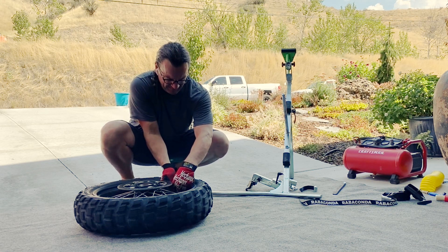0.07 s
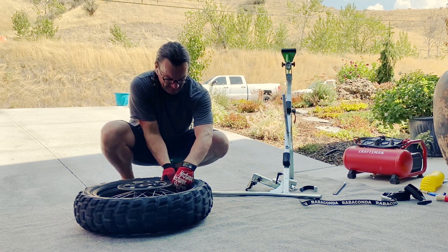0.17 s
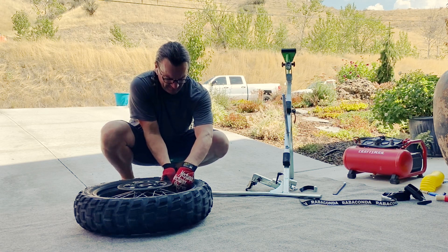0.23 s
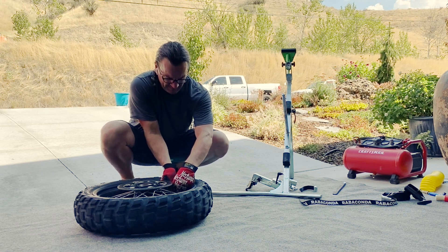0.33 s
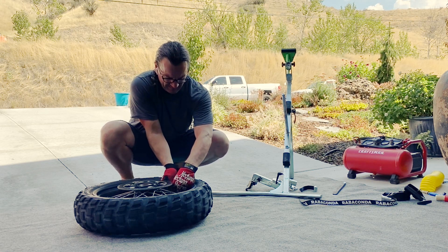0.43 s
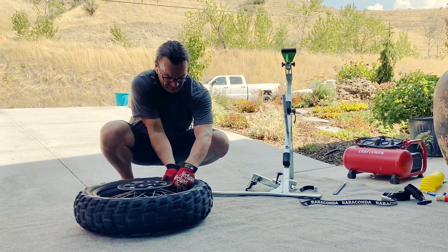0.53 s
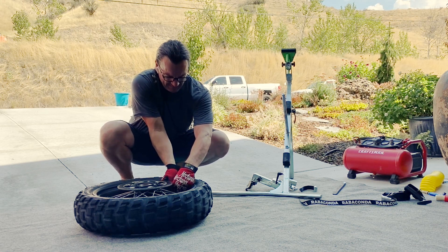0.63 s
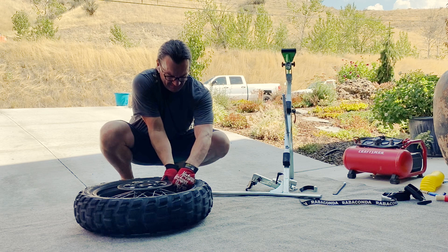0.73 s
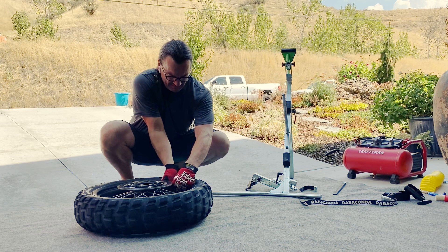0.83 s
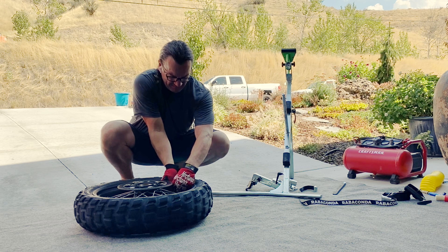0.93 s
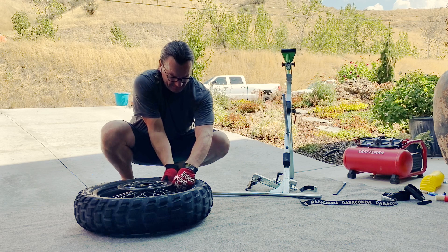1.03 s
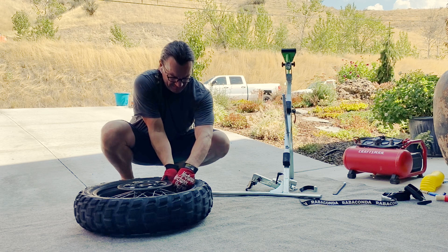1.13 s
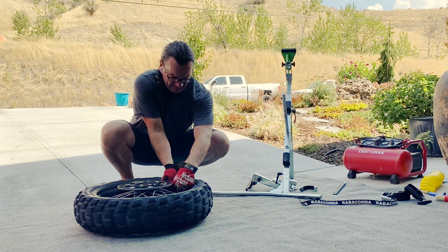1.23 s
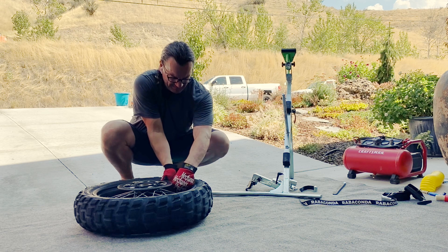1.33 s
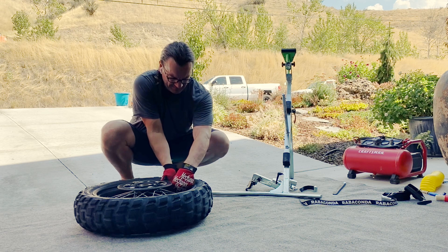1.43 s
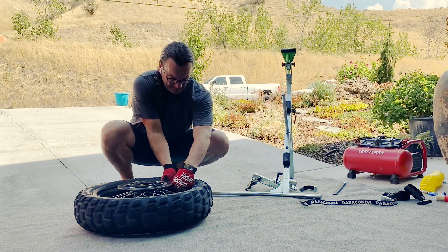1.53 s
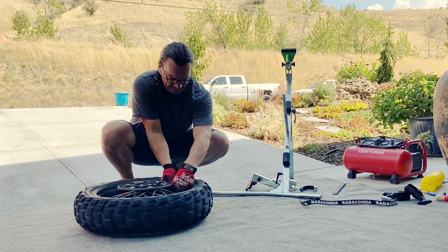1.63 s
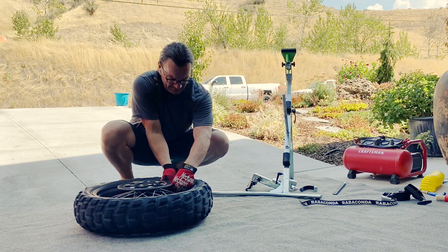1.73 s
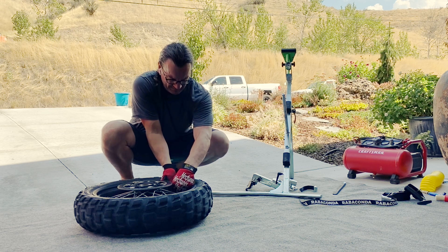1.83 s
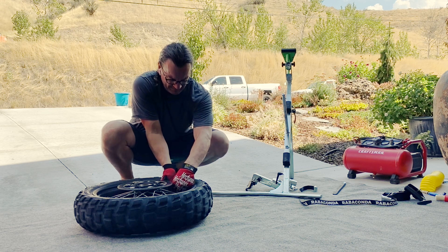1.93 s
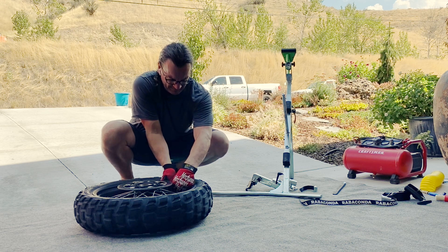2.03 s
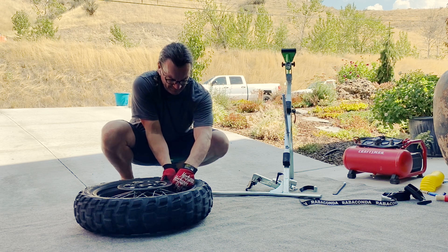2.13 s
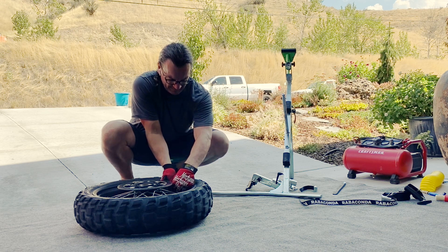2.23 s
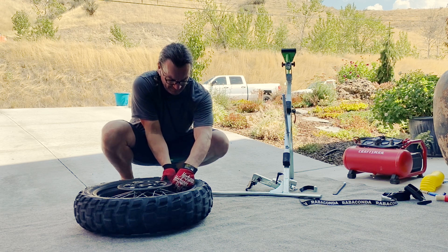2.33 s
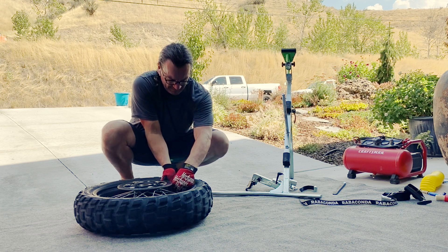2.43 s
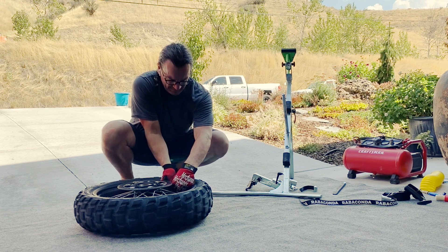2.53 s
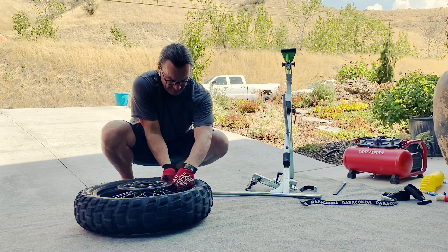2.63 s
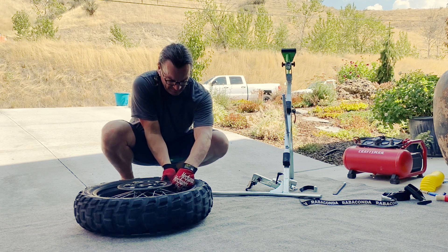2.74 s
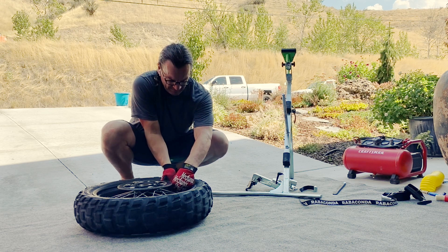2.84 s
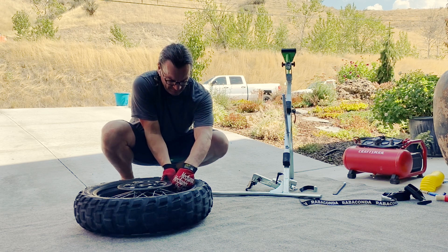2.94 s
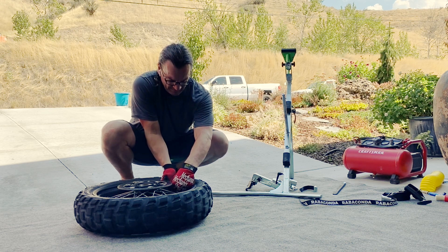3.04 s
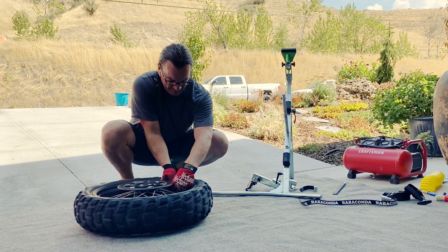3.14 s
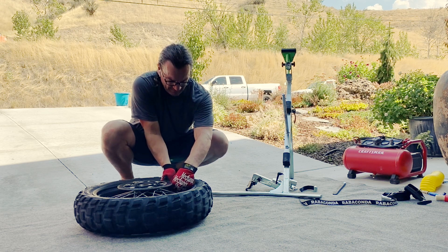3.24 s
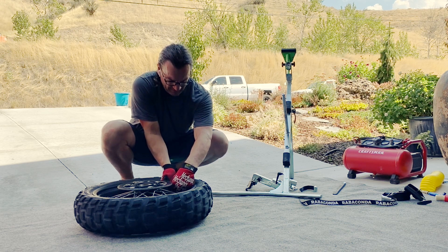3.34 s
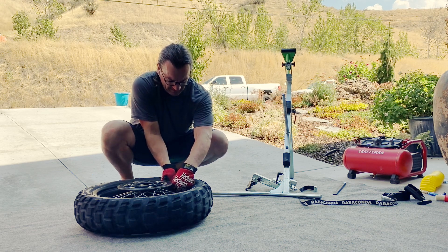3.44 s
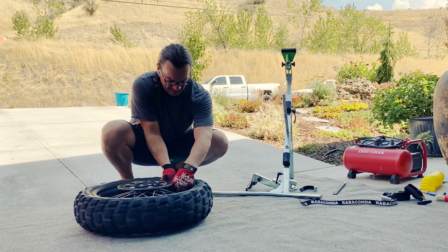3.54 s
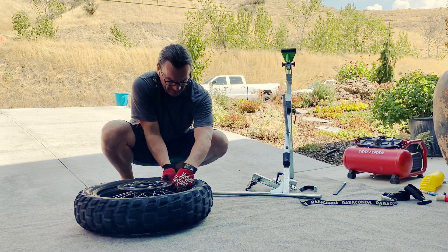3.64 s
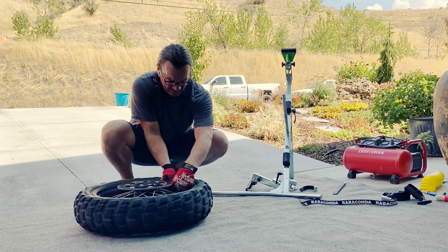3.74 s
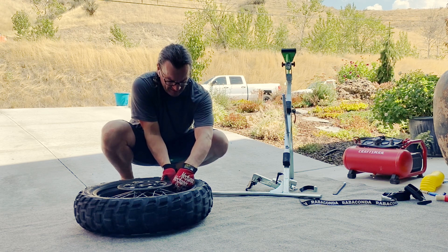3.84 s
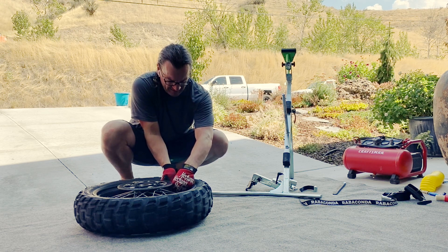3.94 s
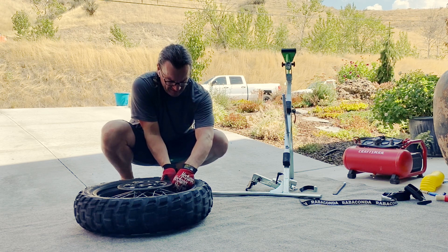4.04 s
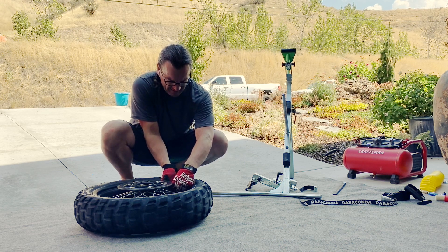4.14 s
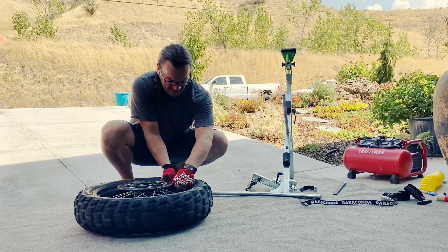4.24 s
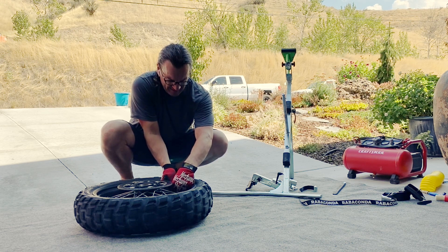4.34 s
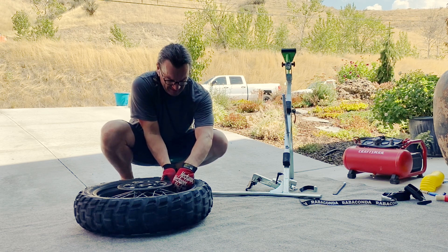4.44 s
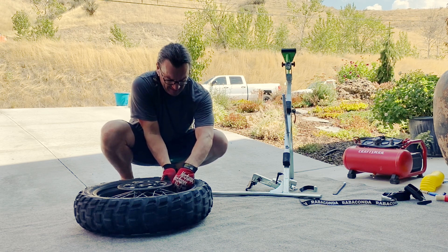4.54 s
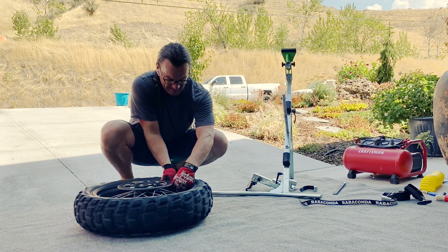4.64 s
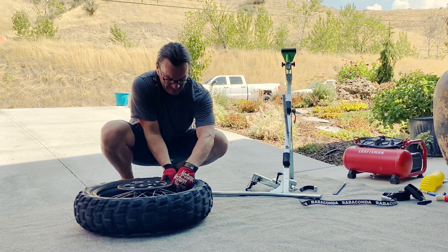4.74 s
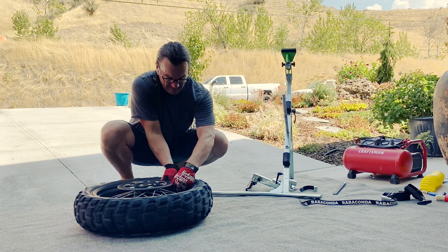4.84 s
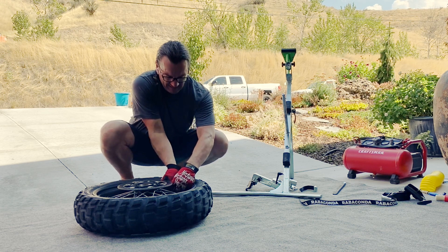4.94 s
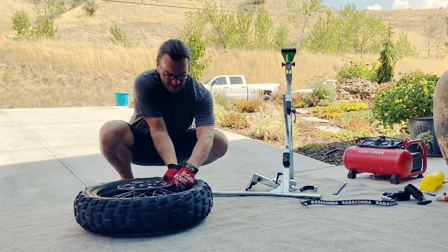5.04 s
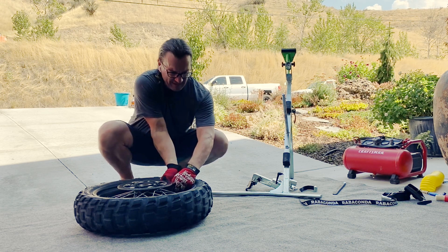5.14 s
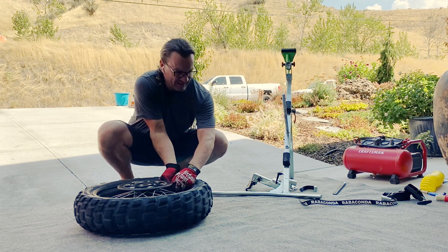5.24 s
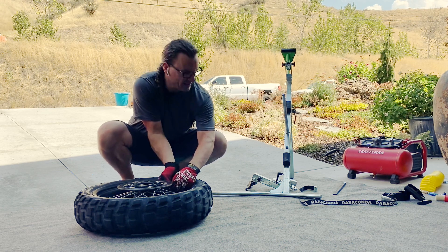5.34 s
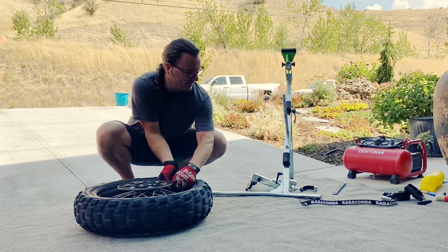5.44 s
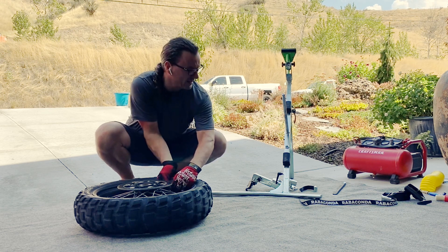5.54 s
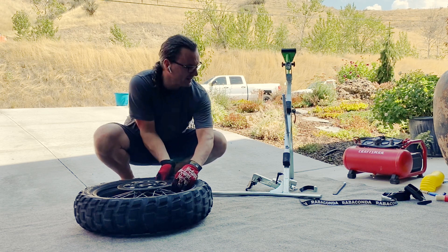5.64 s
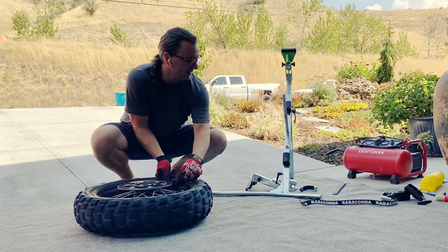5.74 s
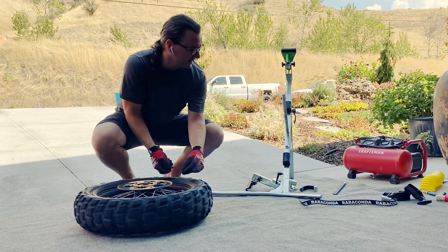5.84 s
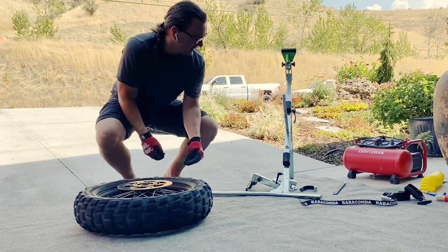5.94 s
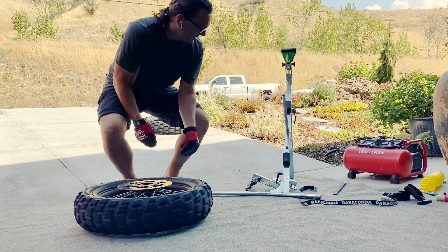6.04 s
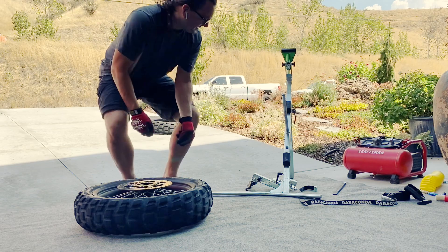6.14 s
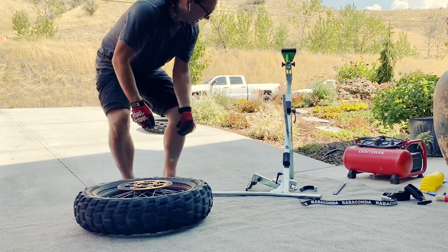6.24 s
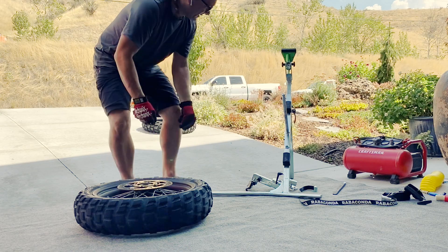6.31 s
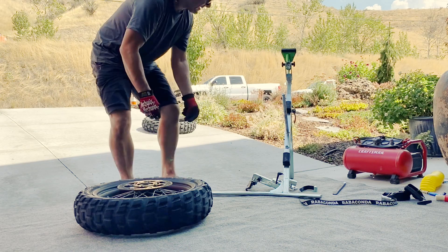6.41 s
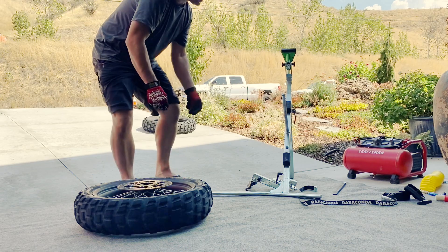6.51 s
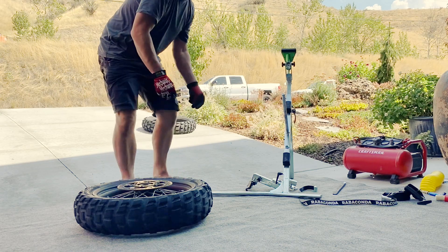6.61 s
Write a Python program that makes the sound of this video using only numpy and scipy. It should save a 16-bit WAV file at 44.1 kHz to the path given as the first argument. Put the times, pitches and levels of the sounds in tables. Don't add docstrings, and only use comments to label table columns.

```python
import sys
import numpy as np
from scipy import signal
from scipy.fft import rfft, irfft, next_fast_len
from scipy.io import wavfile
from scipy.ndimage import uniform_filter1d

SR = 44100
rng = np.random.default_rng(int(sys.argv[2]) if len(sys.argv) > 2 else 0)


def unload_audio(sound):
    columns = np.transpose(np.atleast_2d(sound))
    steps = np.round(np.clip(columns, -1, 1) * 32767)
    wavfile.write(sys.argv[1], SR, steps.astype(np.int16))


def gain_from_db(level_db):
    decades = np.asarray(level_db, float) / 20
    return 10 ** decades


N = 294147
T = np.arange(N) / SR
COARSE_S = np.arange(0, N + 32, 32) / SR
PADDED = next_fast_len(N + 4096)
HZ = np.fft.rfftfreq(PADDED, 1 / SR) + 1e-3
SPURT_ATTACK_S, SPURT_RELEASE_DB_PER_S = 0.031, 272


def rms_one(x):
    return x / np.sqrt(np.mean(x ** 2) + 1e-20)


def in_time(rows):
    s, value = np.transpose(rows)
    return np.interp(T, s, value)


def at_hz(points):
    hz, value = np.transpose(points)
    return np.interp(np.log(HZ), np.log(hz), value)


def filtered(x, response):
    return irfft(rfft(x, PADDED) * response, PADDED)[..., :N]


def modes(table):
    power = 0
    for hz, width_hz, db in table:
        power = power + gain_from_db(db) ** 2 / (1 + (2 * (HZ - hz) / width_hz) ** 2) ** 2
    return power


def drift(rate):
    r = np.exp(-80 * np.pi * rate / SR)
    slow = signal.lfilter([1], [1, -2 * r, r * r], rng.standard_normal(N // 40 + 2002))[2000:]
    return np.interp(np.arange(N) / 40, np.arange(len(slow)), rms_one(slow))


def noise(gain):
    return rms_one(filtered(rng.standard_normal((2, PADDED)), gain))


def bursts(start, length, change_db, attack_s, release_db_per_s):
    t = COARSE_S - start[:, None]
    held_db = np.clip(t / length[:, None], 0, 1) * change_db[:, None]
    fall_db = release_db_per_s * np.maximum(t - length[:, None], 0)
    return np.clip(t / attack_s + .5, 0, 1) ** 2 * gain_from_db(held_db - np.minimum(fall_db, 120))


def summed(gains, db):
    return np.interp(T, COARSE_S, np.sqrt(gain_from_db(db) ** 2 @ gains ** 2))


def played(rows):
    start, length, db, change_db = np.transpose(rows)
    return summed(bursts(start, length, change_db, SPURT_ATTACK_S, SPURT_RELEASE_DB_PER_S), db)


# pitch_hz, level_db_per_hz
RUMBLE = [(12, -41), (20, -18), (43, -7), (72, -7), (133, -8), (187, -15.5), (228, -14.5), (464, -21),
          (600, -35.5), (780, -73), (1320, -120)]
# pitch_hz, level_db_per_hz
AIR = [(290, -40), (500, 1), (960, -4.5), (1310, -3), (1780, -9), (1970, -3.5), (3000, -9), (3900, -22),
       (6600, -120)]
# time_s, level_db
BREEZE = [(0, 8), (.3, 4), (.8, 0.5), (1.3, 3.5), (1.5, -2), (1.68, 2), (1.9, 7), (3.1, 4.5), (3.4, 11),
          (3.7, 4), (4.2, 3)]


def hush():
    breeze_db = in_time(BREEZE)
    rumble = gain_from_db(-64.5 + 0.26 * breeze_db + 0.27 * drift(7.1)) * noise(gain_from_db(at_hz(RUMBLE)))
    return rumble + gain_from_db(-76 + breeze_db) * noise(gain_from_db(at_hz(AIR)))


# time_s, pitch_hz
ENGINE_HZ = [(0, 63.2), (1, 64.96), (2, 68), (3, 70.55), (4.2, 72.85), (6.67, 72.5)]
# time_s, level_db
ENGINE_DB = [(0.0, -55), (0.07, -52.5), (0.82, -64), (1.86, -59), (2.43, -64.5), (2.86, -62), (2.93, -85),
             (3.32, -68), (3.47, -78), (3.57, -66), (3.64, -77), (3.75, -63), (3.94, -83), (4.1, -56.5),
             (4.4, -65.5), (6.35, -59), (6.5, -79), (6.67, -60)]
# multiple, level_db
ENGINE_ORDERS = [(1.5, -23.5), (2, -15.5), (2.5, -22.5)]


def engine():
    phase = 2 * np.pi * np.cumsum(in_time(ENGINE_HZ) * (1 + 0.0057 * drift(10.0))) / SR
    tone = np.sin(phase)
    for multiple, order_db in ENGINE_ORDERS:
        tone = tone + gain_from_db(order_db + 2.3 * drift(3.7)) * np.sin(multiple * phase)
    return np.sqrt(2) * gain_from_db(in_time(ENGINE_DB) - 0.3) * tone * np.array([[1], [0]])


# start_s, peak_db, brightness_db, weight_db
TICKS = [
    (0.651, -52, -13, -20),
    (2.614, -42.5, -16, -15),
    (2.957, -40, -2.5, -15.5),
    (3.465, -47.5, -2, -5),
    (3.473, -35, -9, -9),
    (3.672, -50, -26, -4.5),
    (3.867, -38, -16, -9.5),
    (3.93, -45, -9, -6),
    (4.916, -24.5, -14.5, -28),
]
# pitch_hz, level_db, t60_s, share of brightness (0-1), share of weight (0-1)
RIM = [(361, 11, 0.054, 0.06, 0.95), (448, 4, 0.036, 0, 0.8), (557, 2.5, 0.043, 0.1, 0.12),
       (890, 1, 0.025, 0.1, 0), (1150, 3.5, 0.017, 0.34, 0.06), (1360, 15, 0.0032, 0.7, 0),
       (2170, 8.5, 0.0083, 1, 0.03), (2580, 13, 0.0075, 0.95, 0.1), (2970, 5.5, 0.0073, 1, 0.13),
       (3560, 8, 0.0072, 0.4, 0.3), (4240, 11, 0.0097, 0.96, 0.1)]


def ticks():
    out = np.zeros((2, N))
    start, peak_db, bright_db, weight_db = np.transpose(TICKS)
    bounce_s, bounce_db = np.array([0, .0021, .0047, .0078]), np.array([0.5, -2.0, -5.0, -6.5])
    contacts = np.round((start[:, None] + bounce_s) * SR).astype(int)
    for hz, db, t60, bright, heavy in RIM:
        strike_db = peak_db + bright * bright_db + heavy * weight_db + db - 15.0
        uneven = gain_from_db(rng.normal(0, 2, (2,) + contacts.shape)) * rng.choice([-1, 1], contacts.shape)
        clicks = np.full((2, N), 1e-18)
        clicks[:, contacts] = gain_from_db(strike_db[:, None] + bounce_db) * uneven
        r, w = gain_from_db(-60 / (t60 * SR)), 2 * np.pi * hz / SR
        out += signal.lfilter([0, np.sin(w)], [1, -2 * r * np.cos(w), r * r], clicks)
    crack_db, crack_s = -4, 0.0033
    touch = np.zeros(N)
    touch[contacts[:, 0]] = gain_from_db(peak_db + crack_db + 0.34 * bright_db)
    crack = signal.lfilter([1], [1, -np.exp(-1 / (crack_s * SR))], touch + 1e-18)
    out += crack * rng.standard_normal((2, N))
    return signal.sosfilt(signal.butter(3, [260, 4500], "band", fs=SR, output="sos"), out)


# start_s, length_s, hiss_db, change_db, whistle_db (re hiss)
SEEPS = [(0.0, .52, -60, 7, -5.5), (.52, 0.21, -52.5, -3, -22), (0.798, 0.31, -59, 0.5, -26),
         (1.17, 0.35, -58.5, -2, -16), (1.514, .1, -60, 1.5, -12), (1.62, .11, -55.5, -1.5, -14),
         (1.88, 0.18, -61.5, 5, -10), (2.1, .33, -65.5, 6, -15), (2.439, 0.064, -59, 4, -14),
         (2.605, 0.38, -62, -1, 2), (2.968, 0.041, -56, -1, -11), (3.08, 0.075, -59, -2, -3),
         (3.2, 0.26, -53, 0.5, -4.5), (3.49, 0.18, -62, -1, -4), (3.87, 2.9, -54.5, -4, -12)]
# start_s, length_s, level_db
RESTS = [
    (1.36, .26, -3.5),
    (3.659, 0.19, -1.5),
]
# pitch_hz, level_db_per_hz
SEEP_UPPER = [(4700, -33), (8000, -35), (8400, -15), (8900, -2), (10100, 0.5), (10700, -1.5), (12500, 5.5),
              (14900, 4.5), (15800, 4)]
# pitch_hz, level_db_per_hz
SEEP_LOWER = [(880, -25), (1500, -15), (1820, -18), (2050, -9), (3430, -4), (4460, -4.5), (4930, -1),
              (6000, -5), (6740, 1.5), (8500, -4), (11000, -4), (18700, -120)]
# pitch_hz, width_hz, level_db
SEEP_WHISTLE = [(3460, 120, -5), (5100, 150, -8), (6530, 340, -3), (11300, 450, -6), (12130, 820, 5),
                (13000, 400, -6)]


def seep():
    steady_upper_db, steady_lower_db, steady_whistle_db = -62.5, -64, -74.5
    start, length, hiss_db, change_db, whistle_db = np.transpose(SEEPS)
    seeps = bursts(start, length, change_db, attack_s=0.043, release_db_per_s=200)
    rest_db = 0
    for rest_s, rest_length, db in RESTS:
        rest_db = rest_db + db * (np.abs(T - rest_s - rest_length / 2) < rest_length / 2)
    steady_upper, steady_lower = gain_from_db(steady_upper_db + rest_db), gain_from_db(steady_lower_db + rest_db)
    lower_db = hiss_db - 7.5 + 2.5 * (np.arange(len(start)) < 2)
    upper = np.hypot(summed(seeps, hiss_db), steady_upper)
    lower = np.hypot(summed(seeps, lower_db), steady_lower)
    whistle = np.hypot(summed(seeps, hiss_db + whistle_db), gain_from_db(steady_whistle_db - 1))
    whistle = whistle * gain_from_db(1.5 * drift(8))
    hiss = upper * noise(gain_from_db(at_hz(SEEP_UPPER))) + lower * noise(gain_from_db(at_hz(SEEP_LOWER)))
    low_whistle = gain_from_db(steady_whistle_db - steady_lower_db) * steady_lower
    hiss = hiss + low_whistle * noise(np.sqrt(modes(SEEP_WHISTLE[:3])))
    return hiss + whistle * noise(np.sqrt(modes(SEEP_WHISTLE)))


# pitch_hz, level_db_per_hz
CAVITY_SKIRT = [(47, -51), (80, -14), (382, 0.5), (561, 7.5), (661, -27), (949, -9.5), (1300, -21),
                (1690, -58), (2860, -120)]
# pitch_hz, width_hz, level_db
CAVITY = [(232, 190, -12.5), (351, 167, -4), (502, 69, -1), (541, 93, 0), (580, 54, 2.5), (667, 100, -5),
          (842, 55, -7), (1034, 41, -21.5)]


def cavity():
    skirt = gain_from_db(at_hz(CAVITY_SKIRT) - 7.5)
    return noise(np.sqrt(skirt ** 2 + modes(CAVITY))) * gain_from_db(0.13 * drift(4))


# pitch_hz, width_hz, level_db
SPRAY_BODY = [(2000, 500, 0), (2730, 800, 0)]


def glove(spray):
    return gain_from_db(-11.5) * spray * noise(np.sqrt(modes(SPRAY_BODY)))


def free_outflow():
    core_out_s, jet_db, surge_db, surge_s, sag_db_per_s = 5.47, -27, 6.5, 0.19, 3.5
    since = np.maximum(T - core_out_s, 0)
    level_db = jet_db + surge_db * np.exp(-since / surge_s) - sag_db_per_s * since
    free = np.clip(since / SPURT_ATTACK_S, 0, 1) * gain_from_db(level_db)
    through = np.where(since > 0, 0.24, np.where(T > 4.93, 0.66, 0.26))
    return free, through


# start_s, length_s, jet_db, change_db, struck_db (part hitting tool and fingers)
SPURTS = [(3.875, .01, -48, -4, 0), (3.888, 0.07, -62, 4, 3.5), (3.932, .14, -50.5, -3.5, 5),
          (4.087, .12, -65.5, -7, 9), (4.223, 0.099, -54, 10, 3), (4.309, 0.1, -38.5, 4, 7),
          (4.45, 0.2, -48, 2, -0.5), (4.621, 0.11, -38.5, -2.5, 2.5), (4.718, 0.043, -35, -2, 3.5),
          (4.776, .13, -36, 0, -1.5), (4.916, 0.064, -28.5, 0, -0.5), (4.985, 0.047, -31, 1, -1),
          (5.021, 0.037, -32.5, 0.5, 3), (5.063, 0.17, -27.5, 7, -3.5), (5.232, 0.14, -22, 5, -1.5),
          (5.376, 0.09, -19.5, 0, 1)]
# start_s, length_s, level_db, change_db
SPRAYS = [
    (4.432, 0.16, -45.5, -5),
    (5.552, 0.063, -28.5, -1),
    (6.298, .4, -42.5, 2.5),
]
# start_s, length_s, level_db, change_db
HUMS = [
    (5.14, .19, -46, 10),
    (5.33, 0.11, -29, -1),
    (5.46, 0.14, -35, 0.5),
    (5.56, 0.26, -29, -2),
    (5.8, 0.84, -29.5, -4.5),
]
# pitch_hz, level_db_per_hz
JET = [(3000, -52), (5000, -28), (6060, -5), (7300, -8), (8200, -1.5), (8900, 2), (9590, 2), (12300, 7),
       (14500, 6.5), (15800, 2.5)]
# pitch_hz, level_db_per_hz
SPLASH = [(1760, -45), (3000, -7), (3620, -3), (5000, 1.5), (6050, -1), (6870, -5), (7430, -2.5),
          (8500, -5.5), (11000, -2.5), (18700, -120)]
# pitch_hz, level_db_per_hz
RUSH = [(440, -40), (750, -0.5), (850, 2.5), (938, -7), (995, -4), (1190, 1), (1740, -4), (2530, 0.5),
        (3600, -4.5), (4680, -31), (7920, -120)]
# pitch_hz, width_hz, level_db (over the plain jet)
STEM = [(2650, 280, 0), (4630, 250, 0.5), (6860, 870, 10.5), (9590, 260, 4.5), (10300, 90, -4),
        (12150, 320, -11.5), (16000, 600, -3)]


def valve():
    start, length, jet_db, change_db, struck_db = np.transpose(SPURTS)
    spurts = bursts(start, length, change_db, SPURT_ATTACK_S, SPURT_RELEASE_DB_PER_S)
    puff_db, puff_s = 1, 0.013
    puffs = spurts * gain_from_db(puff_db * np.exp(-np.abs(COARSE_S - start[:, None]) / puff_s))
    free, through = free_outflow()
    spray = played(SPRAYS)
    jet = np.hypot(summed(spurts, jet_db), free)
    splash = np.hypot(summed(spurts, jet_db - 8 + 0.76 * struck_db), free * gain_from_db(-8))
    splash = np.hypot(splash, spray)
    rush = np.hypot(summed(puffs, jet_db - 12 + 1.39 * struck_db), free * gain_from_db(-14))
    ring = np.hypot(summed(puffs, jet_db - 18 + 1.53 * struck_db), played(HUMS))
    hiss = ring * cavity() + rush * noise(gain_from_db(at_hz(RUSH)))
    for spectrum, gain in [(JET, jet), (SPLASH, splash)]:
        colour = gain_from_db(at_hz(spectrum))
        open_air = noise(colour)
        piped = noise(colour * np.sqrt(1 + modes(STEM)))
        hiss = hiss + gain * (np.sqrt(1 - through) * open_air + np.sqrt(through) * piped)
    return hiss + glove(spray)


def shading(x, patchy_db, flutter_db):
    frames = signal.stft(x, nperseg=512)[2]
    patches = rng.standard_normal(frames.shape[1:])
    for axis, size in enumerate([5, 14]):
        for _ in range(2):
            patches = uniform_filter1d(patches, size=size, axis=axis)
    shade = rms_one(gain_from_db(patchy_db * rms_one(patches)))
    shaded = signal.istft(frames * shade, nperseg=512)[1]
    return shaded[:, :N] * gain_from_db(flutter_db * drift(12.0))


# delay_s, level_db
ECHOES = [(.0013, -54), (.0031, -25), (.0068, -17.5), (.0117, -17.5), (.019, -15)]


def driveway(x):
    response = 1
    for k, (delay_s, db) in enumerate(ECHOES):
        response = response + gain_from_db(db) * np.exp(-2j * np.pi * HZ * delay_s) * (-1) ** k
    return filtered(x, response / np.sqrt(np.mean(np.abs(response) ** 2)))


# pitch_hz, lead_radians
LEFT_LEAD = [(0, 0), (1290, 0.5), (2930, -0.2), (3530, -0.6), (4050, -0.4), (4910, -0.7), (5860, -2.4),
             (6630, -1.4), (6980, -1.4), (7580, -2.1), (8250, -2.7), (8800, -1.8), (10700, -0.7),
             (11800, -0.0), (16500, 0.0)]
# pitch_hz, level_db
LEFT_OVER_RIGHT = [(60, 1.5), (110, 3.5), (200, 3.5), (380, 2.5), (700, 5), (1290, 2.0), (2380, 1),
                   (4400, -3), (8120, -2.5), (15000, 0.0)]
# pitch_hz, level_db (re direct)
SCATTERED = [(30, -21), (120, -18), (400, -14), (1200, -7), (2500, -7), (5000, -8), (9000, -10),
             (10800, -14), (12000, -24), (12500, -60)]


def ports(x):
    ratio = gain_from_db(at_hz(SCATTERED))
    tilt = gain_from_db(at_hz(LEFT_OVER_RIGHT) / 2) * np.exp(.5j * np.interp(HZ, *np.transpose(LEFT_LEAD)))
    centre = np.abs(tilt + 1 / tilt) ** 2 + ratio ** 2 * np.abs(tilt - 1 / tilt) ** 2
    left, right = [tilt, 1 / tilt] / np.sqrt(np.maximum(centre / 4, .3))
    left_out = filtered(x, [left, left * ratio]).sum(axis=0)
    right_out = filtered(x, [right, -right * ratio]).sum(axis=0)
    return np.array([left_out, right_out])


def scene():
    background = hush() + engine()
    air = shading(valve() + seep(), patchy_db=1.0, flutter_db=0.38)
    return ports(driveway(air + ticks()) + background)


def top_cut(x):
    return signal.sosfilt(signal.butter(12, 16990, fs=SR, output="sos"), x)


def record(dry):
    top_hz = 15760
    mix = filtered(dry, HZ < top_hz)
    return top_cut(mix)


dry = scene()
out = record(dry)
unload_audio(out)
```